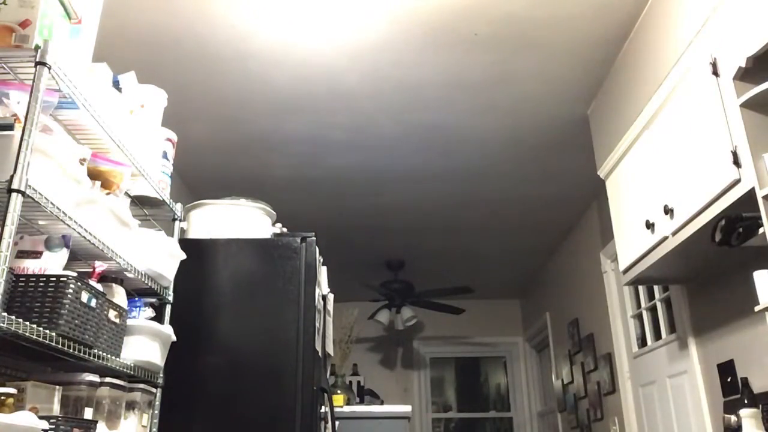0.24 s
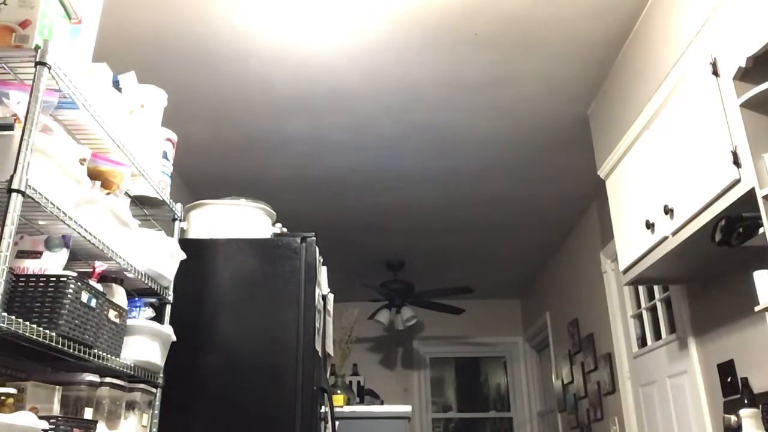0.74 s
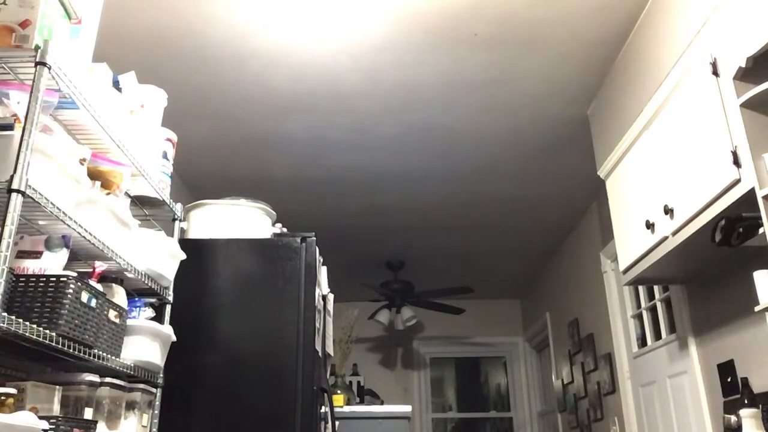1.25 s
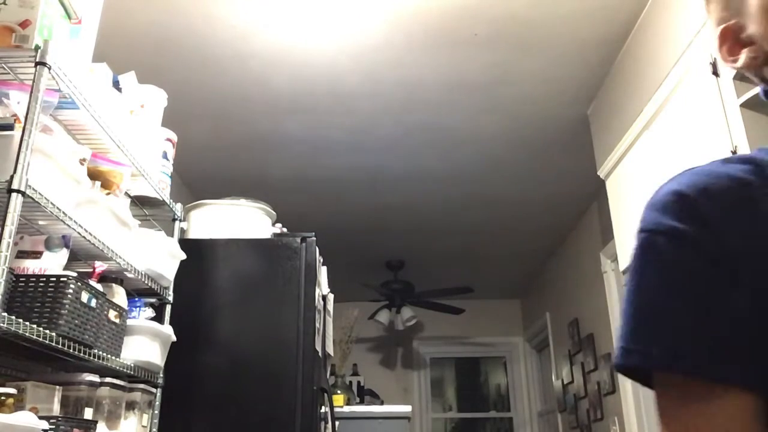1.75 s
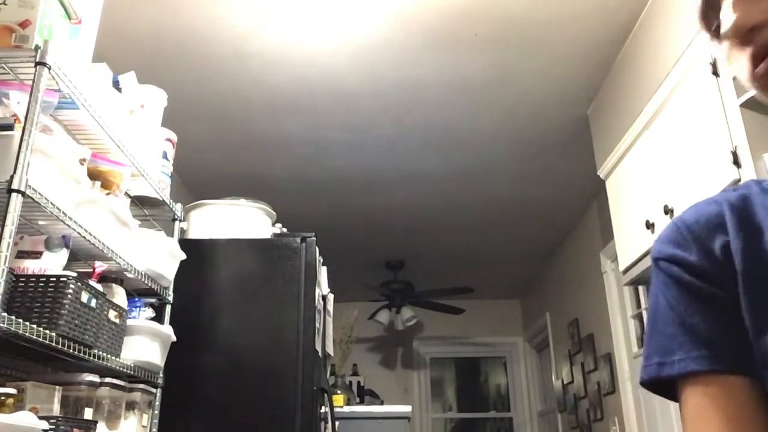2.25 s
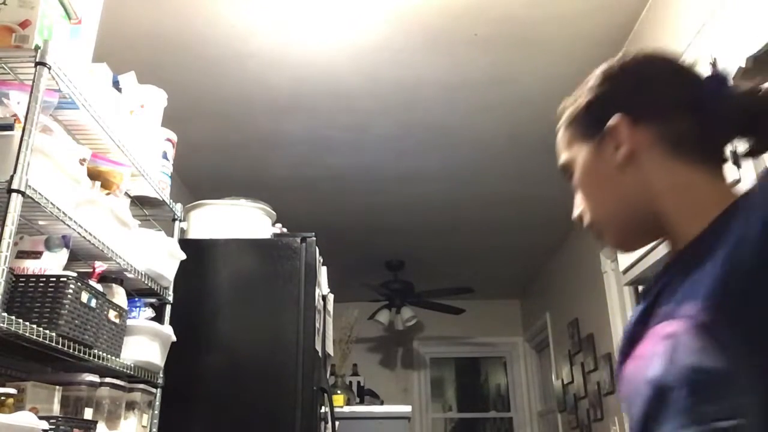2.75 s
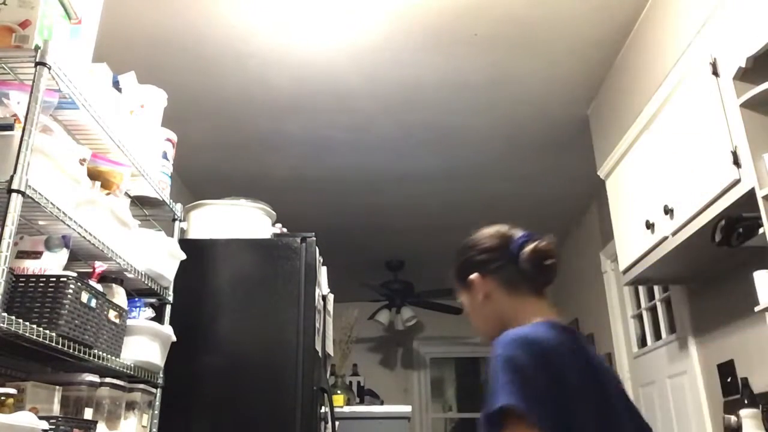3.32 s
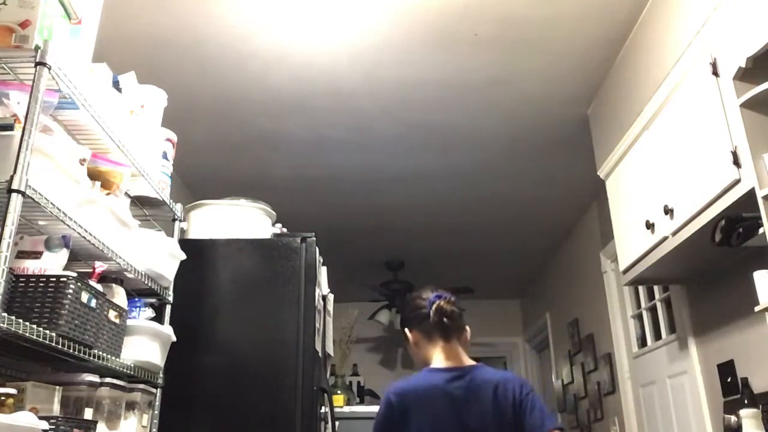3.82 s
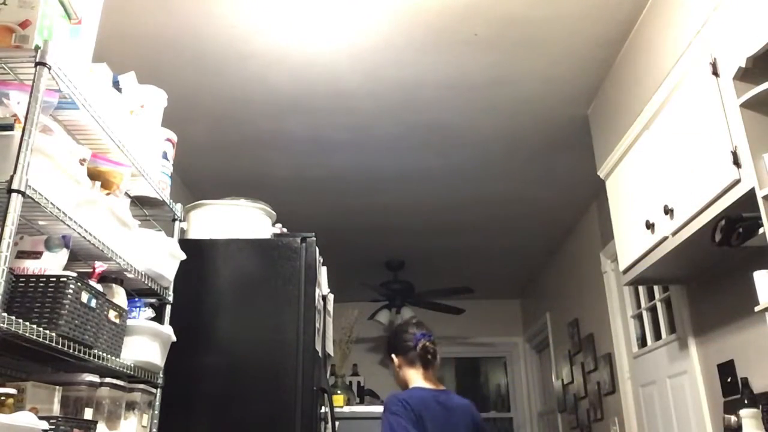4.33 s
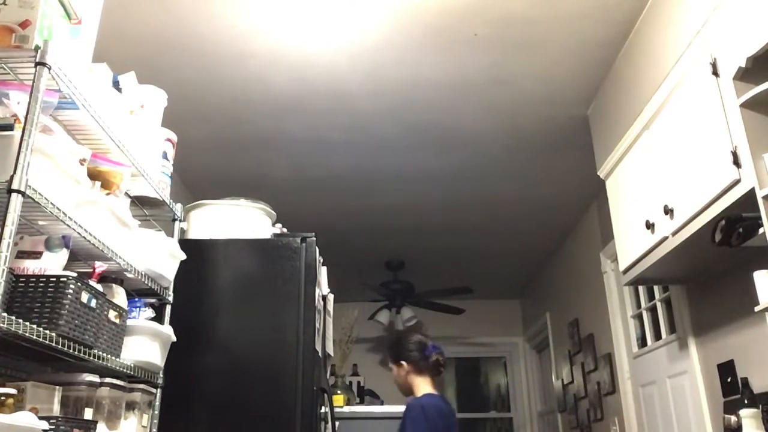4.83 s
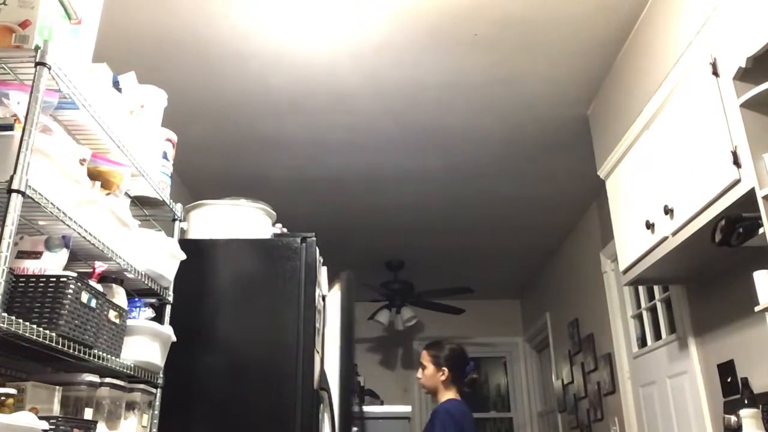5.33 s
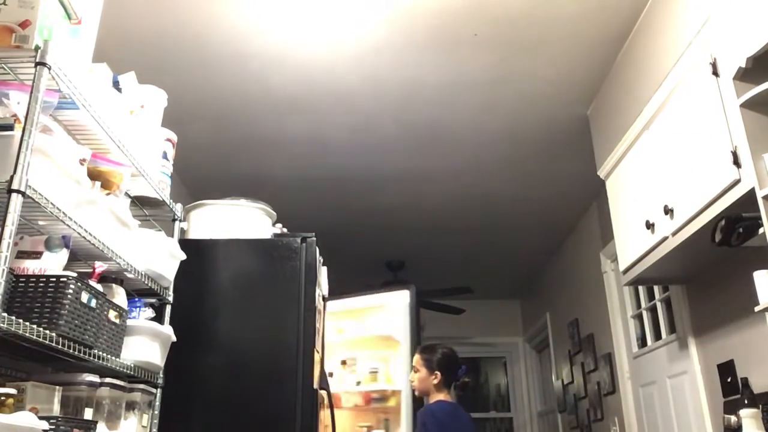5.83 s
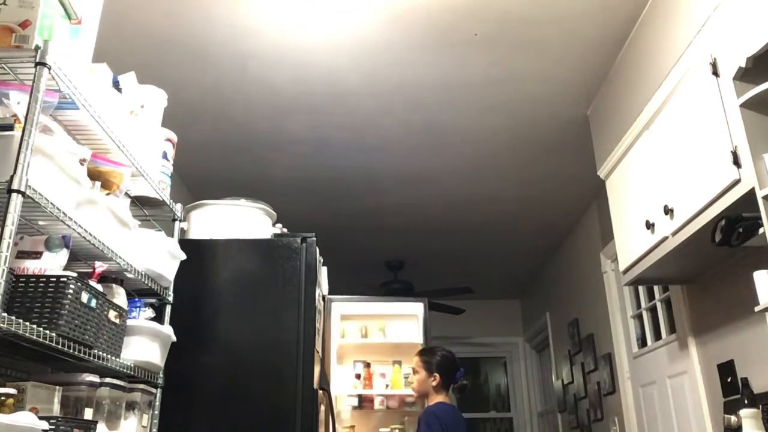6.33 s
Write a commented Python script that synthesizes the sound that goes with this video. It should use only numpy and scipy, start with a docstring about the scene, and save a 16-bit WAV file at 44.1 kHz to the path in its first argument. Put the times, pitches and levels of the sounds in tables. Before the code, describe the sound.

A low, wavering appliance hum near 80 to 110 Hz, with soft airy rumble and a barely audible high whine, fills a kitchen throughout, its strongest tone slowly fading. Faint rustles and clicks at 0.7 to 1.0 s lead to a dull double bump at 1.2 s and a small click at 1.5 s. At 2.24 and 2.37 s two hard knocks crack and boom through the counter under the phone, the loudest sounds, followed by small bounces and a short scrape until about 2.65 s. Footfalls at 3.0, 3.4, 3.8 and faintly 4.1 s thud on the floor, each jogging a small metallic rattle. Five close, bright ticks run from 4.14 to about 4.95 s, quickening and weakening. Tiny clicks and a faint tug come around 5.1 to 5.35 s, then at 5.5 s the fridge seal peels with a crackle and a roomy thump. A faint rustle at 6.1 s, then hum.

```python
"""A low, fluttering appliance hum is heard first, in a kitchen, from a phone that stands on a counter.
After some light handling, two hard knocks shake the counter and something slides briefly on it.
Steps cross the floor and jog a loose metal piece, a run of sharp ticks close by speeds up,
and a fridge door peels off its seal with a thump.
Blows are noise bursts and decaying modes, rubbing is many tiny noise grains, and the hum is wavering tones."""
import sys
import numpy as np
from scipy import signal
from scipy.fft import rfft, irfft
from scipy.io import wavfile
from scipy.ndimage import uniform_filter1d

SR = 44100
rng = np.random.default_rng(int(sys.argv[2]) if len(sys.argv) > 2 else 0)


def digitize_waveform(pressure):
    """Quantize a signal to 16-bit integers and store it at the path in sys.argv[1].

    Rows of a 2-D input are taken as channels; values are limited to [-1, 1].
    """
    field = np.atleast_2d(pressure).T
    bounded = np.clip(field, -1, 1)
    quanta = np.round(bounded * 32767).astype(np.int16)
    wavfile.write(sys.argv[1], SR, quanta)


N = 289737
TIME = np.arange(N) / SR  # s from the start of the scene
AGE = np.arange(2 ** 15) / SR  # s since a blow
BAND_HZ = np.geomspace(50, 17000, 22)  # centres of the noise bands


def amp(db):
    """Turns dB into a linear gain."""
    return 10 ** (np.asarray(db) / 20)


def evened(x):
    """Scales to an rms of one."""
    return x / np.sqrt(np.mean(abs(x) ** 2, axis=-1, keepdims=True) + 1e-20)


def read(points, hz):
    """Reads a table on a log-frequency axis."""
    f, value = np.transpose(points)
    return np.interp(np.log(hz + 1), np.log(f + 1), value)


def add(mix, start_s, sound):
    """Mixes a sound in at a time."""
    part = mix[round(start_s * SR):][:len(sound)]
    part += sound[:len(part)]


def coloured(x, colour):
    """Causal, minimum-phase filter with the given gain over frequency."""
    hz = abs(np.fft.fftfreq(8192, 1 / SR))
    log_gain = np.log(amp(read(colour, hz)))
    taps = np.fft.ifft(np.exp(np.conj(signal.hilbert(log_gain)))).real
    return signal.oaconvolve(x, taps[:len(taps) // 2])[:N]


def tilted(tilt):
    """Band levels that lean bright or dull about 1 kHz, in dB per octave."""
    return tilt * np.log2(BAND_HZ / 1000)


def level(strokes, rise_db_per_s, fall_db_per_s):
    """Gain over time for strokes that each swell, hold and die away."""
    gain = np.zeros(N)
    for start, length, db in strokes:
        before = np.maximum(start - TIME, 0)
        after = np.maximum(TIME - start - length, 0)
        gain += amp(db - rise_db_per_s * before - fall_db_per_s * after)
    return gain


def friction(gain, colour, per_s, spread_db, grain_s):
    """Many tiny slips of uneven size, each a short puff of noise."""
    sizes = amp(spread_db * np.minimum(rng.exponential(1, N), 4))
    slips = sizes * (rng.random(N) < per_s / SR)
    power = signal.lfilter([1], [1, -np.exp(-1 / (grain_s * SR))], slips ** 2)
    white = rfft(rng.standard_normal(N))
    pink = irfft(white / np.sqrt(np.fft.rfftfreq(N, 1 / SR) + BAND_HZ[0]), N)
    return gain * evened(coloured(pink * np.sqrt(power), colour))


def band_noise():
    """One row of steady noise for each band, overlapping its neighbours."""
    hz = np.fft.rfftfreq(len(AGE), 1 / SR)
    bands = np.arange(len(BAND_HZ))
    place = np.interp(np.log(hz + 1), np.log(BAND_HZ + 1), bands, left=-1)
    share = np.maximum(1 - abs(place - bands[:, None]), 0)
    random_phase = np.exp(2j * np.pi * rng.random(share.shape))
    z = np.fft.ifft(np.sqrt(share) * random_phase, len(AGE))
    return evened((z / np.sqrt(abs(z) + 1e-12)).real)  # flattens the envelope


# How long the kitchen rings. Each row: frequency in Hz, t60 in seconds.
ROOM = [(80, 0.6), (300, 0.54), (1000, 0.26), (3000, 0.34), (8000, 0.18), (16000, 0.11)]


def burst(band_db, rise, fall, room_db, lag):
    """Dense vibration after a blow, then the room's tail. Rise and fall (s) hold at 1 kHz; bass is slower."""
    hz = BAND_HZ[:, None]
    slow = (1000 / hz) ** lag
    direct = np.exp(-AGE / (fall * slow))
    tail = amp(room_db - 60 * AGE / read(ROOM, hz)) * np.sqrt(slow)
    swell = 1 - np.exp(-(AGE / (rise * slow)) ** 2)
    envelope = amp(band_db)[:, None] * swell * np.hypot(direct, tail)
    return (envelope * band_noise()).sum(0)


def boom(hz, swell, sharpness, room_db):
    """A low panel mode that swells (s), dies and lingers in the room."""
    u = AGE / swell
    body = (u * np.exp(1 - u)) ** sharpness
    tail = amp(room_db - 60 * AGE / read(ROOM, hz)) * np.minimum(u, 1)
    return (body + tail) * np.sin(2 * np.pi * hz * AGE)


def ring(modes, build_cycles):
    """Dying modes of alternating sign, each building up over its first cycles."""
    out = np.zeros(len(AGE))
    for k, (hz, db, t60) in enumerate(modes):
        build = 1 - np.exp(-AGE * hz / build_cycles)
        decay = amp(db - 60 * AGE / t60)
        out += (-1) ** k * decay * build * np.sin(2 * np.pi * hz * AGE)
    return out


def bending_wave(cycles, rise, length):
    """A flexing panel carries treble faster than bass, so a blow arrives as a falling sweep."""
    shape = (1 - np.exp(-(AGE / rise) ** 2)) * np.exp(-(AGE / length) ** 2)
    return shape * np.sin(2 * np.pi * cycles * np.log((AGE + 1 / SR) / length))


def tone(hz, wander_hz):
    """A tone of rms one whose pitch wavers."""
    drift = evened(uniform_filter1d(rng.standard_normal(N), int(SR / (2 * wander_hz + 2))))
    turns = rng.random() + np.cumsum(hz + wander_hz * drift) / SR
    return np.sqrt(2) * np.sin(2 * np.pi * turns)


# The strongest hum tone flutters and slowly fades.
DRONE_HZ, DRONE_DB, DRONE_FADE_DB_PER_S = 83.4, -43, 1.3
FLUTTER_DB, FLUTTER_S = 2, .07  # rms depth, smoothing time
# Appliance hum and a faint high whine. Each row: frequency in Hz, rms level in dB, rms wander in Hz.
HUM = [(55.8, -58.5, 1.1), (85.2, -64.5, 6.6), (109.1, -54.5, 3), (114.6, -53, 3), (208.5, -55, .8),
       (355.6, -65, 6), (413, -71.5, 2), (15200, -98.5, 120)]
# Colour of the moving air. Each row: frequency in Hz, relative density in dB per Hz.
AIR = [(76, -40), (130, -9), (183, -4), (215, -4.5), (233, -15.5), (263, -8), (303, -11.5), (349, -5),
       (444, -14.5), (577, -17.5), (1140, -32.5), (1290, -32), (1610, -38), (14800, -50.5), (16000, -53)]


def hum():
    """Motor tones over moving air and a low rumble."""
    hz = np.fft.rfftfreq(N, 1 / SR)
    air = evened(irfft(rfft(rng.standard_normal(N)) * amp(read(AIR, hz)), N))
    low_band = signal.butter(4, [58, 170], "band", fs=SR, output="sos")
    rumble = evened(signal.sosfilt(low_band, rng.standard_normal(N)))
    flutter = evened(uniform_filter1d(rng.standard_normal(N), int(FLUTTER_S * SR)))
    drone_db = DRONE_DB - DRONE_FADE_DB_PER_S * TIME + FLUTTER_DB * flutter
    drone = amp(drone_db) * tone(DRONE_HZ, wander_hz=0.85)
    tones = sum(amp(db) * tone(f, wander) for f, db, wander in HUM)
    return amp(-53) * air + amp(-50.5) * rumble + drone + tones


# Faint rustles of handling. Each row: start in seconds, length in seconds, level in dB.
RUSTLES = [(.69, 0.043, -68), (.85, 0.032, -68.5), (6.085, .02, -67)]
RUSTLE_RISE_DB_PER_S, RUSTLE_FALL_DB_PER_S = 400, 159
# Their colour. Each row: frequency in Hz, relative gain in dB.
RUSTLE_COLOUR = [(300, -8), (900, -2), (2500, -11), (6000, -10), (15000, -12)]


def rustles():
    """Soft, brief rubbing, made of tiny slips, as things are handled."""
    gain = level(RUSTLES, RUSTLE_RISE_DB_PER_S, RUSTLE_FALL_DB_PER_S)
    return friction(gain, RUSTLE_COLOUR, per_s=300, spread_db=1.5, grain_s=.004)


# Small clicks around the kitchen. Each row: start in seconds, level in dB, centre in Hz, width in octaves.
CLICKS = [(.83, -65.5, 7000, 0.53), (1.007, -68.5, 6030, 0.93), (1.4944, -63.5, 8000, 3.3),
          (1.496, -50.5, 2440, 0.37), (3.003, -66, 8900, 1.8), (3.176, -71, 11000, 1.2),
          (5.085, -66.5, 5450, 1.8), (5.338, -66, 1590, 1.3), (6.073, -70, 2810, 1.2)]


def small_clicks():
    """Light clicks around the kitchen, each a burst about one centre frequency."""
    out = np.zeros(N)
    for s, db, hz, octaves in CLICKS:
        colour = 20 * np.log10(1 / (1 + (np.log2(BAND_HZ / hz) / octaves) ** 2))
        add(out, s, amp(db) * burst(colour, rise=0.00025, fall=0.032, room_db=-3.0, lag=0.85))
    return out


# Dull bumps of cabinets and the fridge door.
# Each row: start in seconds, level in dB before the panel's colour, brightness in dB per octave.
BUMPS = [(1.171, -41, 0.5), (1.189, -42.5, -0.5), (5.517, -54, -5), (5.5433, -29, 3.5)]
# The panels' colour. Each row: frequency in Hz, gain in dB.
PANEL_COLOUR = [(60, -7.5), (150, 2), (280, -10), (400, 2.5), (600, -5.5), (900, -10), (1400, -21),
                (2600, -23.5), (5000, -38), (15000, -42)]


def bumps():
    """Large, light panels answer a push with a dull, roomy sound."""
    out = np.zeros(N)
    for s, db, tilt in BUMPS:
        add(out, s, amp(db) * burst(tilted(tilt), rise=0.0029, fall=0.0062, room_db=-9.5, lag=0.37))
    return coloured(out, PANEL_COLOUR)


# Blows on the counter under the phone. Each row: start in seconds, crack in dB before its colour,
# drive of the ringing modes in dB, drive of the deep thump in dB.
KNOCKS = [(2.2353, -13, -18, -9), (2.366, -30, -38.5, -43), (2.3736, -17, -18, -18.5),
          (2.415, -30.5, -27.5, -31), (2.429, -31, -42, -38), (2.476, -32.5, -32.5, -33)]
# A harder blow is brighter, by this many dB per octave for each dB.
NEUTRAL_BLOW_DB, BRIGHTER_PER_DB = -15.5, 0.1787
# The counter's modes. Each row: frequency in Hz, relative level in dB, t60 in seconds.
COUNTER_MODES = [(142.5, -7, 0.27), (177.8, -3, .45), (281.7, 2.5, 0.2), (344.3, -6.5, .36),
                 (427, -2.5, 0.13), (453, -0.5, .27), (556, -14.5, 0.6), (676, -12.5, 0.07),
                 (685, -10.5, 0.35), (757, -11, .28), (804, -14.5, .22), (1067, -13, 0.17),
                 (1085, -20, 0.12), (1235, -17, .13), (1322, -14, .12), (1396, -18, 0.22),
                 (1575, -28.5, .22), (1703, -15, 0.11), (1880, -26, 0.24), (2070, -29, .2),
                 (2190, -31.5, 0.15), (2440, -21, 0.17), (2800, -33, .2), (3500, -28, .09)]
# Colour of the crack. Each row: frequency in Hz, gain in dB.
CRACK_COLOUR = [(50, -30), (100, -17), (200, -7), (400, 2), (760, 3), (920, -7), (1350, 1.5), (1620, -8.5),
                (2100, -13), (2550, -6), (3000, -12), (4300, -16), (7000, -30), (15000, -32)]
# The object skids as it lands, then is pushed into place.
# Each row: start in seconds, length in seconds, level in dB before the mix.
SLIDES = [(2.415, 0.016, -44.5), (2.555, 0.082, -42.5)]
SLIDE_RISE_DB_PER_S, SLIDE_FALL_DB_PER_S = 168.5, 292
# Colour of the slide. Each row: frequency in Hz, relative gain in dB.
SCRAPE_COLOUR = [(100, -19), (300, 5), (480, -1.5), (900, -4.5), (1380, 5), (1650, -9), (2600, -7.5),
                 (5000, -17.5), (6700, -23), (8000, -20.5), (11000, -24.5), (16000, -31.5)]


def counter():
    """Knocks crack, bend and ring the counter; a short slide rubs the same modes."""
    cracks, body = np.zeros(N), np.zeros(N)
    modes = ring(COUNTER_MODES, build_cycles=1.2)
    for s, crack_db, ring_db, thump_db in KNOCKS:
        tilt = BRIGHTER_PER_DB * (crack_db - NEUTRAL_BLOW_DB)
        crack = burst(tilted(tilt), rise=0.00057, fall=0.0071, room_db=-20.5, lag=0.68)
        airborne_snap = burst(tilted(-1.6), rise=.002, fall=0.016, room_db=-8.5, lag=.1)
        add(cracks, s, amp(crack_db) * crack)
        add(body, s + .003, amp(crack_db - 38.5) * airborne_snap)
        add(body, s, amp(ring_db) * modes)
        add(body, s, amp(thump_db - 0.5) * bending_wave(cycles=2.8, rise=0.0096, length=.02))
        add(body, s, amp(thump_db) * boom(hz=108.1, swell=0.022, sharpness=15, room_db=-12.5))
        add(body, s, amp(thump_db - 6.5) * boom(hz=79.5, swell=0.026, sharpness=5.7, room_db=-12.5))
    gain = level(SLIDES, SLIDE_RISE_DB_PER_S, SLIDE_FALL_DB_PER_S)
    slide = friction(gain, SCRAPE_COLOUR, per_s=300, spread_db=-1.5, grain_s=0.005)
    ringing = signal.oaconvolve(slide, modes / np.linalg.norm(modes))[:N]
    return coloured(cracks, CRACK_COLOUR) + body + amp(-0.5) * slide + amp(-17.5) * ringing


# Footfalls across the floor. Each row: start in seconds, heel in dB before its colour,
# brightness in dB per octave, floor boom in dB.
STEPS = [(2.994, -41.5, -0.6, -25.5), (3.437, -39, 2.25, -29), (3.799, -42, 3.04, -33),
         (4.099, -57, 0, -47)]
# Colour of the heel. Each row: frequency in Hz, gain in dB.
HEEL_COLOUR = [(60, -7), (130, -2.5), (180, 3), (240, 1), (460, 3), (720, 0), (1000, -9.5), (1400, -8),
               (1800, -5), (2150, -8), (3150, -11), (3700, -23), (5300, -27), (7000, -41), (15000, -48)]


def footsteps():
    """The heel's treble comes first; the slow bending of the floor follows."""
    heels, floor = np.zeros(N), np.zeros(N)
    for s, heel_db, tilt, floor_db in STEPS:
        heel = burst(tilted(tilt), rise=0.0034, fall=0.017, room_db=-7.5, lag=0.59)
        add(heels, s, amp(heel_db) * heel)
        add(floor, s, amp(floor_db) * boom(hz=88.2, swell=0.067, sharpness=7.2, room_db=-29))
        add(floor, s, amp(floor_db - 8.0) * boom(hz=176.0, swell=0.024, sharpness=7.3, room_db=2.5))
    return coloured(heels, HEEL_COLOUR) + floor


# Each footfall jogs a loose metal piece, which jingles and bounces once.
RATTLE_DELAY_S, RATTLE_DB = 0.048, -25  # after the heel, and relative to its treble
BOUNCE_S, BOUNCE_DB = .0235, -2  # after the first touch, and relative to it
# The piece's modes. Each row: frequency in Hz, relative level in dB, t60 in seconds.
METAL_MODES = [(2444, 8, 0.06), (4450, -2.5, 0.065), (5170, 3.5, 0.038), (5360, -7, 0.13),
               (6100, -10, 0.097), (7650, -10, .1), (7900, -20, .12), (10900, -23, 0.045)]


def rattles():
    """A sharper footfall jogs the loose piece harder; each touch is a tiny click and a short, high ring."""
    out = np.zeros(N)
    treble_octaves = np.log2(METAL_MODES[2][0] / 1000)
    for s, heel_db, tilt, _ in STEPS:
        touch_s = s + RATTLE_DELAY_S
        jog_db = heel_db + tilt * treble_octaves + RATTLE_DB
        for start, db in [(touch_s, jog_db), (touch_s + BOUNCE_S, jog_db + BOUNCE_DB)]:
            click = burst(tilted(-1.1), rise=0.00091, fall=0.0073, room_db=4.0, lag=0.45)
            add(out, start, amp(db) * ring(METAL_MODES, build_cycles=0.83))
            add(out, start, amp(db - 10.5) * click)
    return out


# Soft, deep thuds of the floor and the fridge.
# Each row: start in seconds, frequency in Hz, level in dB, swell in seconds.
THUDS = [(3.748, 56.3, -32, 0.044), (5.535, 106, -26.5, 0.036), (5.546, 59, -32, 0.042)]


def thuds():
    """Weight shifts the floor, and the fridge cabinet rocks as its door comes free."""
    out = np.zeros(N)
    for s, hz, db, swell in THUDS:
        add(out, s, amp(db) * boom(hz, swell, sharpness=1.5, room_db=-46))
    return out


# A run of sharp ticks close by, each one sooner and weaker than the last.
TICK_START_S, TICK_GAP_S, TICK_HURRY_S = 4.1438, .2615, .0375  # first tick, first gap, cut per gap
TICK_DB, TICK_FADE_DB = -35.5, 1.7  # first tick before its colour, drop per tick
# Colour of the ticks. Each row: frequency in Hz, gain in dB.
TICK_COLOUR = [(500, -24), (1200, -30.5), (2900, -14), (3700, -20.5), (6700, -16.5), (7900, -7.5),
               (9500, -13.5), (11000, -3), (12300, -8), (13600, 1), (14800, 0), (16000, -7)]


def ticks(count):
    """Very short, bright ticks close by, speeding up as they weaken."""
    out, s = np.zeros(N), TICK_START_S
    for k in range(count):
        db = TICK_DB - k * TICK_FADE_DB
        vibration = burst(tilted(0), rise=0.00096, fall=0.0042, room_db=-22, lag=0.33)
        nearby_surfaces = burst(tilted(-3.5), rise=0.00082, fall=0.024, room_db=-7.5, lag=0.16)
        add(out, s + .0004, amp(db + 20.5) * np.ones(1))  # the snap itself
        add(out, s, amp(db) * vibration)
        add(out, s + 0.0045, amp(db - 6.0) * nearby_surfaces)
        s += TICK_GAP_S - k * TICK_HURRY_S
    return coloured(out, TICK_COLOUR)


# The door seal stretches, then tears free. Each row: start in seconds, length in seconds, level in dB.
PULLS = [(5.352, 0.024, -57), (5.487, 0.068, -41.5)]
PULL_RISE_DB_PER_S, PULL_FALL_DB_PER_S = 400, 175
# Colour of the seal. Each row: frequency in Hz, relative gain in dB.
SEAL_COLOUR = [(100, 3.5), (250, 7.5), (600, 7.5), (850, 0), (1250, 5), (1700, -5), (2400, -1),
               (4000, -5.5), (7000, -7), (11000, -9.5), (16000, -32)]
# A brief, bright fizz as the seal parts. Each row: start in seconds, length in seconds, level in dB.
FIZZ = [(5.504, .007, -53)]
FIZZ_RISE_DB_PER_S, FIZZ_FALL_DB_PER_S = 383, 238
# Colour of the fizz. Each row: frequency in Hz, relative gain in dB.
FIZZ_COLOUR = [(4000, -13), (10000, 2), (16000, -7)]


def fridge_door():
    """The rubber seal peels with a fine crackle, which the walls return a little later, and a fizz."""
    pull = level(PULLS, PULL_RISE_DB_PER_S, PULL_FALL_DB_PER_S)
    peel = friction(pull, SEAL_COLOUR, per_s=810, spread_db=5.5, grain_s=0.0056)
    parting = level(FIZZ, FIZZ_RISE_DB_PER_S, FIZZ_FALL_DB_PER_S)
    fizz = friction(parting, FIZZ_COLOUR, per_s=800, spread_db=3, grain_s=0.0024)
    walls = burst(10 * np.log10(BAND_HZ), rise=0.0027, fall=0.015, room_db=7, lag=0.086)
    reflected = signal.oaconvolve(peel, walls / np.linalg.norm(walls))[:N]
    return peel + fizz + amp(-3.5) * reflected


def scene():
    """Sums every source into one channel."""
    background = hum() + rustles() + small_clicks()
    impacts = bumps() + counter() + footsteps() + rattles() + thuds() + ticks(count=5)
    return (background + impacts + fridge_door())[None]


def record(dry):
    """The phone's microphone: the loudest peaks are rounded off, then the treble ends at 16.5 kHz."""
    rounded = dry / (1 + dry ** 6) ** (1 / 6)
    lowpass = signal.firwin(401, 16500, window=("kaiser", 9), fs=SR)
    return signal.oaconvolve(rounded, lowpass[None], "same")


dry = scene()
out = record(dry)
digitize_waveform(out)
```